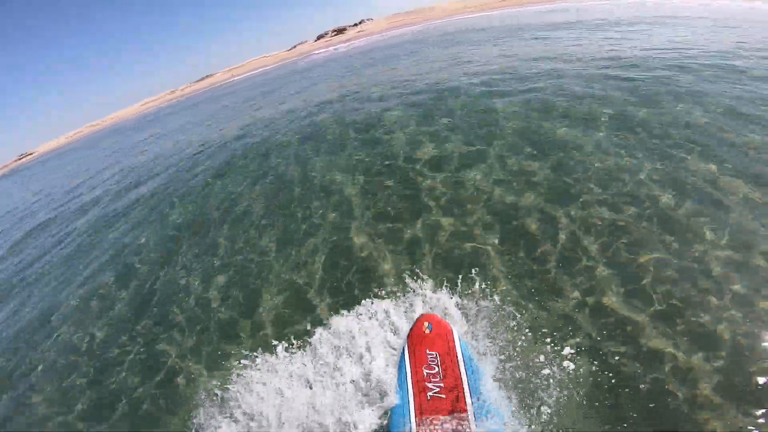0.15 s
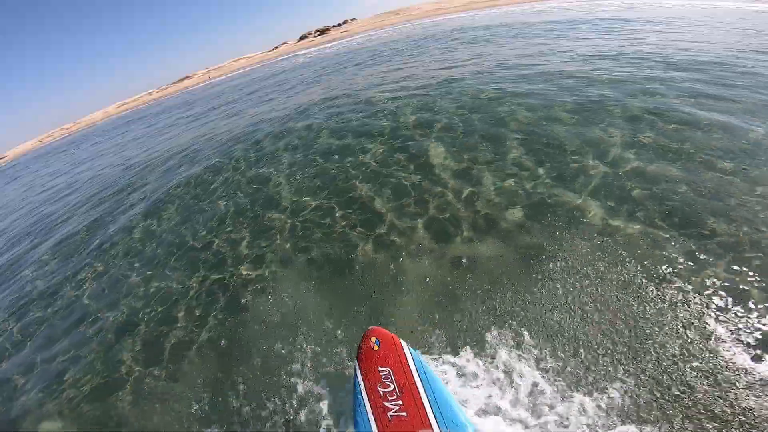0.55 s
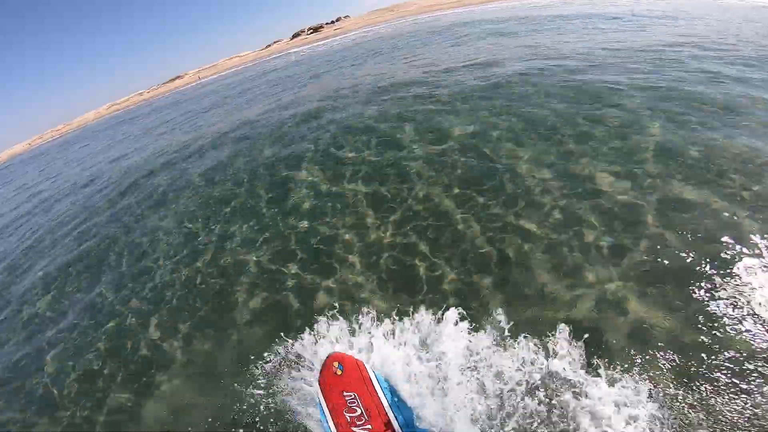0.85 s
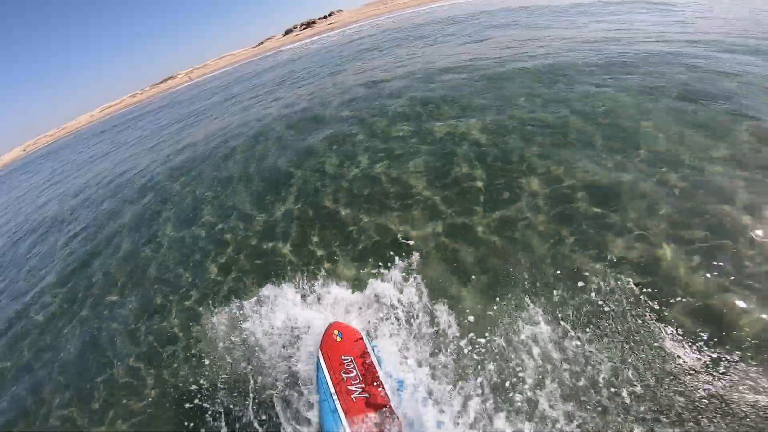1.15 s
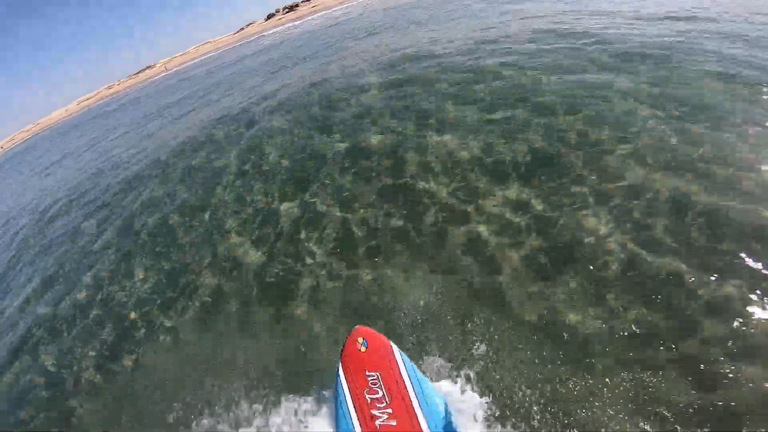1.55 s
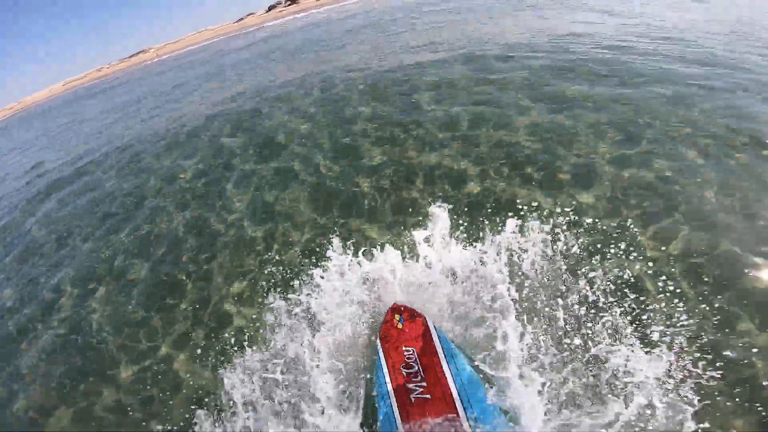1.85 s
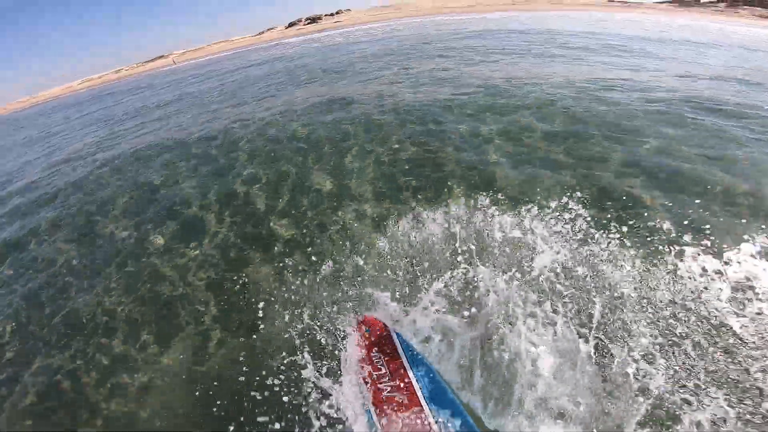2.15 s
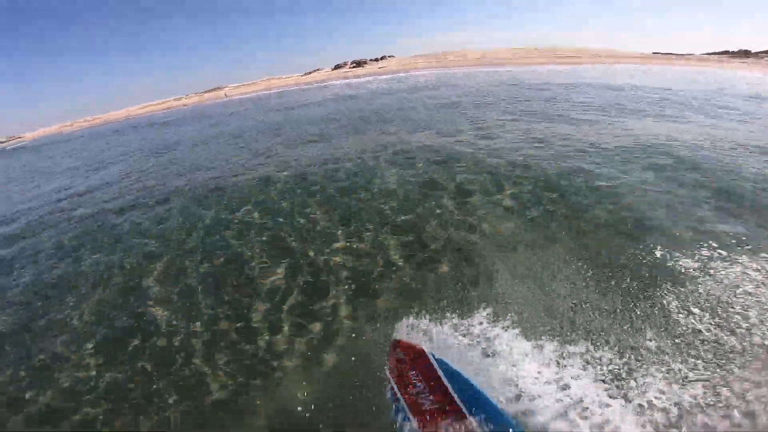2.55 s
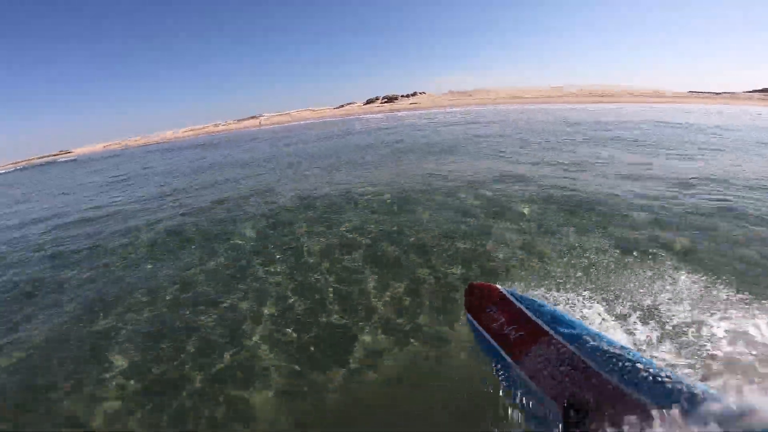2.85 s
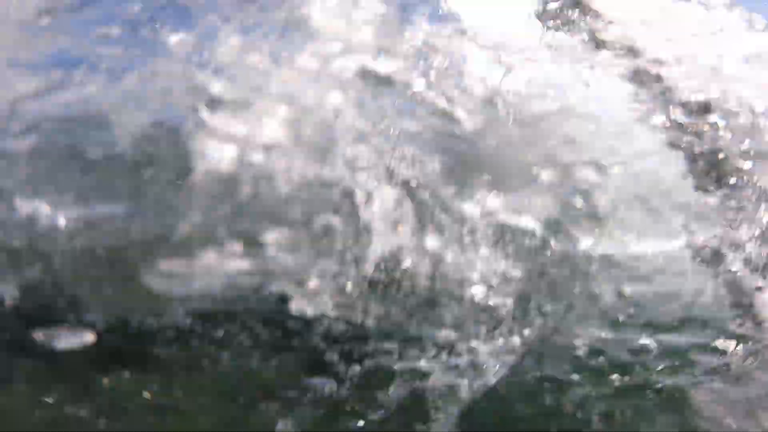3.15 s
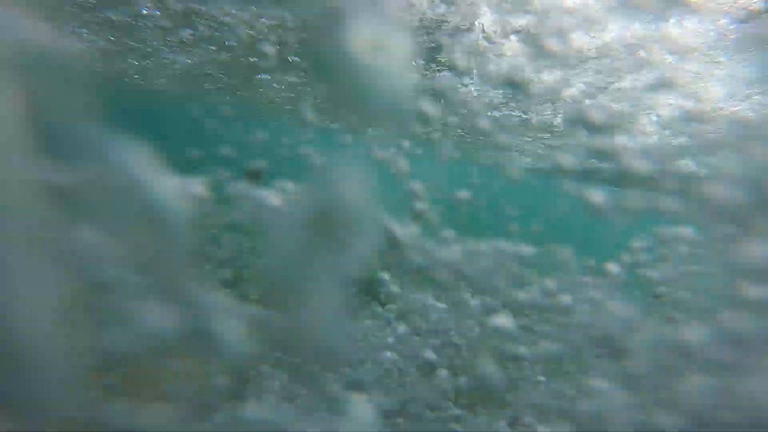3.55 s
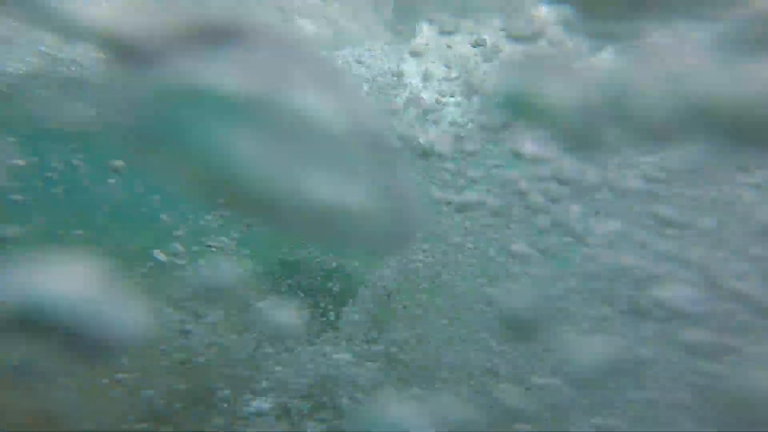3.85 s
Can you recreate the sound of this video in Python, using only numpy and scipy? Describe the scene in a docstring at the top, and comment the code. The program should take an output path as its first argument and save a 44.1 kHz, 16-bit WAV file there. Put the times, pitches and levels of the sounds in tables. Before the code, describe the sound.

Churning water rushes around a surfboard, with wind buffeting the close microphone in shallow sea; at three seconds the rider falls with a heavy splash, and the microphone goes under into muffled rumbling, gurgling bubbles.

```python
"""Wind buffets the microphone while a surfboard planes through shallow sea, its bow wave churning and spraying.
At three seconds the rider falls: a splash closes in around a booming air pocket and the microphone goes under.
With a crack of high pings, big bubbles rumble and gurgle, small ones pop, water slaps the case, knocks ring it.
Water is shaped noise plus swarms of ringing clicks; bubbles, pings, air pocket and case are sines; slaps are noise."""
import sys
import numpy as np
from scipy import signal
from scipy.fft import rfft, irfft
from scipy.io import wavfile

SR = 44100
rng = np.random.default_rng(int(sys.argv[2]) if len(sys.argv) > 2 else 0)


def persist_wave(psi):
    """Save psi, clipped to +-1, as 16-bit WAV."""
    counts = np.round(np.clip(psi, -1, 1) * 32767).astype(np.int16)
    wavfile.write(sys.argv[1], SR, np.atleast_2d(counts).T)


N = 176400
T = np.arange(N) / SR  # time of each sample, s

# loudness during the ride: t/s, wind level/dB, bow wave level/dB, spray level/dB
RIDE_LEVELS = [(0, -26, -27, -46.5), (0.15, -21, -26.5, -45.5), (0.29, -25, -27.5, -45),
               (0.35, -26, -24.5, -45), (0.65, -27.5, -26, -45.5), (0.88, -27, -23.7, -45.5),
               (1.02, -31, -25.5, -43.5), (1.22, -28, -25, -44.5), (1.4, -30, -27.5, -44.5),
               (1.63, -31, -27, -47), (1.77, -30.5, -23.5, -45), (2.05, -33.5, -28.5, -45),
               (2.65, -35, -28, -41.5), (3.03, -34.5, -24.5, -40)]
# loudness during the fall: t/s, bass level/dB, churning water level/dB, spray level/dB
FALL_LEVELS = [(3.06, -20, -15, -31), (3.088, -25.5, -17, -32.5), (3.105, -34, -20, -36.5),
               (3.14, -29, -17, -36), (3.29, -23, -19.5, -40.5), (3.46, -14.5, -18.5, -38),
               (3.535, -11, -15, -43)]
# loudness under water: t/s, rumble level/dB, gurgle level/dB, fizz level/dB
DIVE_LEVELS = [(3.565, -18.5, -12.5, -32), (3.63, -11.5, -16, -29.5), (3.665, -18, -22, -34.5),
               (3.76, -19, -12, -32.5), (3.83, -18, -19.5, -39.5), (3.91, -23, -17, -39.5),
               (3.97, -18.5, -20.5, -49)]
# tone colour of the wind, bow wave and its spray: f/Hz, level/dB
RIDE_COLOUR = [(25, -17.5), (70, -6.5), (140, -2.5), (260, -0.5), (380, -2), (700, -0.5), (1420, -5),
               (2000, -17.5), (3000, -32), (3900, -41), (5800, -40), (6400, -52), (8500, -51), (11000, -72)]
# tone colour of the splash: f/Hz, level/dB
SPLASH_COLOUR = [(25, -1), (90, -1), (260, 2.5), (450, -2), (1200, -4), (1600, -13), (3800, -45.5),
                 (5800, -48.5), (6600, -57), (9000, -60), (12000, -87.5)]
# tone colour of the water below the surface: f/Hz, level/dB
DEEP_COLOUR = [(20, -9), (60, -1.5), (130, 2), (450, -0.5), (800, -20), (1500, -33), (5000, -59),
               (6500, -69)]
# pitch of the air pocket, mostly falling as it opens: t/s, f/Hz, level/dB
AIR_POCKET = [(3.14, 522.6, -32), (3.26, 421, -18.5), (3.3, 280.2, -21.5), (3.355, 256.7, -9.5),
              (3.45, 266.7, -13), (3.56, 224.4, -17.5)]
# water slapping the case: t/s, peak level/dB, upper edge of the noise f/Hz, decay to 1/e t/s
CASE_SLAPS = [(3.483, -12, 1900, 0.0049), (3.498, -28, 5900, .0026), (3.539, -21, 3200, 0.0049),
              (3.554, -17.5, 3000, 0.0052), (3.565, -32, 6500, 0.014), (3.601, -12, 1160, .004),
              (3.749, -10.5, 1150, .0018), (3.78, -13.5, 1200, 0.0012)]
# bubbles heard one by one, and three short high pings that make the crack of the plunge at 3.565 s:
# t/s, starting pitch f/Hz, peak level/dB
BUBBLES_AND_PINGS = [(3.514, 1015, -16), (3.523, 253, -7.5), (3.555, 58, -6.5), (3.564, 3420, -28.5),
                     (3.565, 4010, -23), (3.565, 4570, -28), (3.574, 177, -14), (3.583, 432, -6.5),
                     (3.585, 222, -11), (3.612, 2360, -29.5), (3.621, 376, -4.5), (3.66, 1900, -33),
                     (3.669, 2610, -32), (3.697, 347, -11), (3.722, 617, -16), (3.728, 2510, -37.5),
                     (3.749, 476, -8.5), (3.753, 106.5, -14), (3.778, 956, -20), (3.784, 300, -10),
                     (3.813, 119, -9), (3.859, 3450, -35.5), (3.868, 620, -19), (3.875, 114, -8),
                     (3.878, 188, -7), (3.897, 398, -11.5), (3.912, 690, -19.5), (3.934, 2450, -35.5),
                     (3.936, 120, -10), (3.943, 316, -8.5), (3.98, 186.5, -4)]
# knocks that set the case ringing: t/s, level/dB, strongest near f/Hz
CASE_KNOCKS = [(3.566, -35, 3450), (3.573, -39.5, 4450), (3.603, -41, 4400), (3.63, -41, 3800),
               (3.677, -45.5, 4210), (3.703, -47.5, 4200), (3.752, -54, 4270), (3.899, -50.5, 3870),
               (3.902, -62, 4790), (3.938, -64, 4040)]
# ringing modes of the case: f/Hz, level/dB, time to fall by 60 dB t/s
CASE_MODES = [(3370, 1.5, .13), (3960, 6, .04), (4260, 0.5, 0.14), (4600, -0.5, .08), (4790, -0.5, 0.071)]

FALL_S, UNDER_S = 3.058, 3.551  # the rider falls; the microphone goes under
CROSSFADE_S = .014  # full length of a fade
LOWS_HZ, MIDS_HZ, HIGHS_HZ = (25, 400), (400, 2000), (2000, 13000)
RUMBLE_HZ, GURGLE_HZ, FIZZ_HZ = (20, 150), (150, 700), (700, 7000)
# tilts act on each side of 1 kHz, in opposite directions
BRIGHTEN_DB_PER_S = 1.92  # the bow wave grows thinner and brighter as the board turns
DARKEN_DB_PER_S = 11  # the splash dulls as the water closes over the microphone
BUBBLE_RISE = 0.075  # share by which the pitch climbs while a bubble or ping rings
BUBBLE_CYCLES, CYCLES_GROWTH = 27, 0.41  # cycles of ringing at 1 kHz; power by which they grow with pitch
CASE_WAVER = .01  # typical share by which passing bubbles detune the case
FOCUS_DB_PER_OCTAVE = 57.5  # modes away from a knock's pitch ring less
KNOCK_ATTACK_S = 0.0014  # soft contact
CUTOFF_HZ = 15700


def from_db(db):
    """Turn decibels into a multiplying factor."""
    return 10 ** (np.asarray(db) / 20)


def rms_one(x):
    """Scale a sound to an average power of 1."""
    return x / np.sqrt(np.mean(x ** 2) + 1e-20)


def in_time(rows):
    """Draw straight lines between a table's points, giving each column a value at every sample."""
    times, *columns = np.transpose(rows)
    return [np.interp(T, times, column) for column in columns]


def after(s):
    """Fade from 0 to 1, centred on a moment."""
    return np.clip((T - s) / CROSSFADE_S + .5, 0, 1)


def drift(rate):
    """Slow random motion with spread 1: smoothed noise, worked out at every 40th sample."""
    r = np.exp(-80 * np.pi * rate / SR)
    noise = rng.standard_normal(N // 40 + 2002)
    slow = signal.lfilter([1], [1, -2 * r, r * r], noise)[2000:]  # skip the filter's start
    return np.interp(np.arange(N) / 40, np.arange(len(slow)), rms_one(slow))


def ring(clicks, hz, t60):
    """A resonance: each unit click starts a sine of height about 1 that falls by 60 dB in t60 seconds."""
    r = np.exp(-np.log(1000) / (t60 * SR))
    w = 2 * np.pi * hz / SR
    return signal.lfilter([0, np.sin(w)], [1, -2 * r * np.cos(w), r * r], clicks + 1e-18)


def add(out, s, sound):
    """Mix a sound in, starting at s seconds."""
    start = int(np.clip(s * SR, 0, N - 1))
    out[start:start + len(sound)] += sound[:N - start]


def tilted(x, tilt_db):
    """Raise what lies above 1 kHz and lower what lies below, by the same decibels."""
    low = signal.sosfiltfilt(signal.butter(2, 1000, fs=SR, output="sos"), x)
    high = x - low
    return low * from_db(-tilt_db) + high * from_db(tilt_db)


def bubble_swarm(low, high, per_s, cycles, size_db):
    """Bubbles at random moments, ringing at three pitches in a band; per_s counts each pitch."""
    swarm = np.zeros(N)
    for pitch in np.geomspace(low, high, 7)[1::2]:
        chance = rng.random(N) * SR / per_s
        born = np.flatnonzero(chance < 1)
        rarity = np.minimum(-np.log(chance[born] + 1e-9), 4)  # a few bubbles are much stronger
        clicks = np.zeros(N)
        clicks[born] = from_db(abs(size_db) * rarity) * (-1.) ** born
        swarm += ring(clicks, pitch, cycles / pitch)
    return swarm


def water(spectrum, band, per_s, cycles, size_db, grain_db, patchy_db):
    """Turbulence and ringing bubbles in roughly third-octave bands that swell on their own; rms 1."""
    hz = np.arange(N // 2 + 1) * SR / N + 1e-3
    count = int(np.log2(band[1] / band[0]) * 3) + 1
    edges = np.geomspace(*band, count + 1)
    out = 0
    for low, high in zip(edges, edges[1:]):
        swarm = bubble_swarm(low, high, per_s / (count * 3), cycles, size_db)
        noise = rfft(rng.standard_normal(N))
        eddies = irfft(noise * ((hz >= low) & (hz < high)), N)
        mix = rms_one(eddies) + from_db(grain_db) * rms_one(swarm)
        out = out + np.sqrt(high - low) * mix * from_db(patchy_db * drift(26))
    points = np.array(spectrum)
    colour = from_db(np.interp(np.log(hz), np.log(points[:, 0]), points[:, 1]))
    # fade out steeply beyond both ends of the band
    skirts = 1 / np.sqrt((1 + (.9 * band[0] / hz) ** 24) * (1 + (hz / band[1] / 1.1) ** 24))
    return rms_one(irfft(rfft(out) * colour * skirts, N))


def wind():
    """Wind buffeting the microphone: low noise whose level follows the ride until the fall."""
    wind_db, _, _ = in_time(RIDE_LEVELS)
    buffeting = water(RIDE_COLOUR, LOWS_HZ, per_s=420, cycles=7.1, size_db=1.5, grain_db=-13.0, patchy_db=1.43)
    return from_db(wind_db) * buffeting * (1 - after(FALL_S))


def case_ring():
    """Each knock favours case modes near its own pitch; passing bubbles make the ring waver and break up."""
    out = 0
    for hz, mode_db, t60 in CASE_MODES:
        level = np.zeros(N)
        fade = np.tanh(T / KNOCK_ATTACK_S) * np.exp(-np.log(1000) * T / t60)
        for s, db, focus_hz in CASE_KNOCKS:
            octaves_away = abs(np.log2(hz / focus_hz))
            add(level, s, from_db(db + mode_db - FOCUS_DB_PER_OCTAVE * octaves_away) * fade)
        phase = 2 * np.pi * np.cumsum(hz * (1 + CASE_WAVER * drift(90))) / SR
        out = out + level * from_db(1.8 * drift(80)) * np.sin(phase)
    return out


def slaps():
    """Water slapping the case: short bursts of noise, kept above 350 Hz and below each slap's upper edge."""
    out = np.zeros(N)
    t = T[:SR // 20]
    for s, db, bright_hz, decay_s in CASE_SLAPS:
        burst = rng.standard_normal(len(t)) * np.exp(-t / decay_s)
        edges_hz = [350, np.clip(bright_hz, 600, SR / 3)]
        burst = signal.sosfilt(signal.butter(3, edges_hz, "band", fs=SR, output="sos"), burst)
        add(out, s, from_db(db) * burst / np.abs(burst).max())
    return out


def underwater():
    """Rumble and gurgle of large bubbles, with a faint fizz of small ones."""
    rumble_db, gurgle_db, fizz_db = in_time(DIVE_LEVELS)
    rumble = water(DEEP_COLOUR, RUMBLE_HZ, per_s=250, cycles=8.1, size_db=4.5, grain_db=-5.5, patchy_db=1.0)
    gurgle = water(DEEP_COLOUR, GURGLE_HZ, per_s=350, cycles=10, size_db=2.0, grain_db=2.5, patchy_db=2.2)
    fizz = water(DEEP_COLOUR, FIZZ_HZ, per_s=500, cycles=20, size_db=2.5, grain_db=5, patchy_db=3.0)
    mix = from_db(rumble_db) * rumble + from_db(gurgle_db) * gurgle + from_db(fizz_db) * fizz
    return mix * after(UNDER_S)


def bubble_or_ping(hz, cycles):
    """A sine that swells over its first cycle, then dies as its pitch climbs; peak 1."""
    age = np.arange(int(cycles / hz * SR)) * hz / (cycles * SR)  # from 0 to 1
    tone = np.sin(2 * np.pi * cycles * (age + BUBBLE_RISE * age ** 2 / 2))
    tone = tone * np.exp(-np.log(1000) * age) * np.tanh(cycles * age) ** 2
    return tone / np.abs(tone).max()


def bubbles_and_plunge_crack():
    """Gulps and pops of single bubbles, and three high pings, made the same way, that crack at the plunge."""
    out = np.zeros(N)
    for s, hz, db in BUBBLES_AND_PINGS:
        cycles = BUBBLE_CYCLES * (hz / 1000) ** CYCLES_GROWTH  # higher ones ring for more cycles
        add(out, s, from_db(db) * bubble_or_ping(hz, cycles))
    return out


def air_pocket():
    """The cavity behind the body booms: a sine of unsteady, mostly falling pitch until it closes."""
    hz, db = in_time(AIR_POCKET)
    unsteady_hz = hz * (1 + .02 * drift(50))
    tone = np.sin(2 * np.pi * np.cumsum(unsteady_hz) / SR) * from_db(1.5 * drift(30))
    closing_s = AIR_POCKET[-1][0]
    return from_db(db) * tone * after(FALL_S) * (1 - after(closing_s))


def splash():
    """The rider hits the water: a heavier, lumpier rush whose churning middle darkens."""
    bass_db, churn_db, spray_db = in_time(FALL_LEVELS)
    bass = water(SPLASH_COLOUR, LOWS_HZ, per_s=200, cycles=11.0, size_db=0.0, grain_db=-2, patchy_db=0.0)
    churn = water(SPLASH_COLOUR, MIDS_HZ, per_s=2800, cycles=34, size_db=3.0, grain_db=-3, patchy_db=1.8)
    spray = water(SPLASH_COLOUR, HIGHS_HZ, per_s=2200, cycles=12, size_db=0.5, grain_db=-2.0, patchy_db=4.5)
    # bright at first, neutral halfway, dull at the end
    tilt_db = DARKEN_DB_PER_S * ((FALL_S + UNDER_S) / 2 - np.clip(T, FALL_S, UNDER_S))
    churn = tilted(from_db(churn_db) * churn, tilt_db)
    mix = from_db(bass_db) * bass + churn + from_db(spray_db) * spray
    return mix * after(FALL_S) * (1 - after(UNDER_S))


def bow_wave():
    """The board's churning bow wave and its spray: two bands of water that surge together."""
    _, wave_db, spray_db = in_time(RIDE_LEVELS)
    surge_db = .5 * drift(18)
    wave = water(RIDE_COLOUR, MIDS_HZ, per_s=2500, cycles=9.8, size_db=2.5, grain_db=-4, patchy_db=1.23)
    spray = water(RIDE_COLOUR, HIGHS_HZ, per_s=10000, cycles=2.5, size_db=0.5, grain_db=-3.5, patchy_db=0.65)
    wave = tilted(from_db(wave_db + surge_db) * wave, BRIGHTEN_DB_PER_S * (T - FALL_S / 2))
    return (wave + from_db(spray_db + surge_db) * spray) * (1 - after(FALL_S))


def scene():
    """Ride, fall and dive, added together at one microphone."""
    above = wind() + bow_wave() + splash() + air_pocket()
    below = underwater() + bubbles_and_plunge_crack() + slaps() + case_ring()
    return (above + below)[None]


def record(dry):
    """Round off the highest peaks, then cut the top of the treble."""
    rounded = dry / (1 + (dry / .98) ** 8) ** (1 / 8)
    return signal.sosfilt(signal.cheby2(12, 70, CUTOFF_HZ, fs=SR, output="sos"), rounded)


dry = scene()
out = record(dry)
persist_wave(out)
```